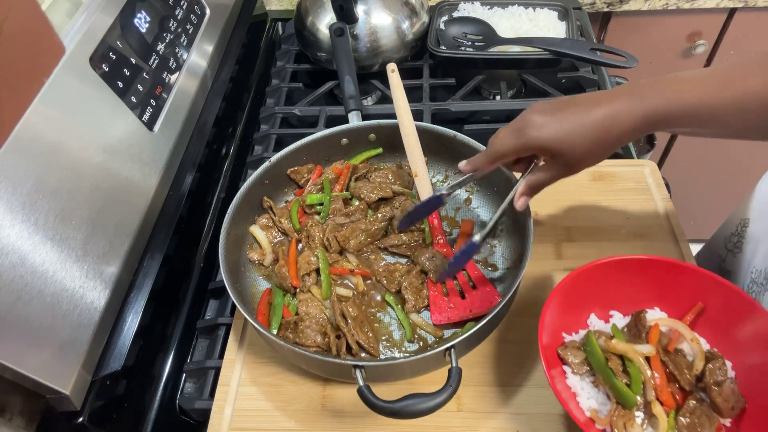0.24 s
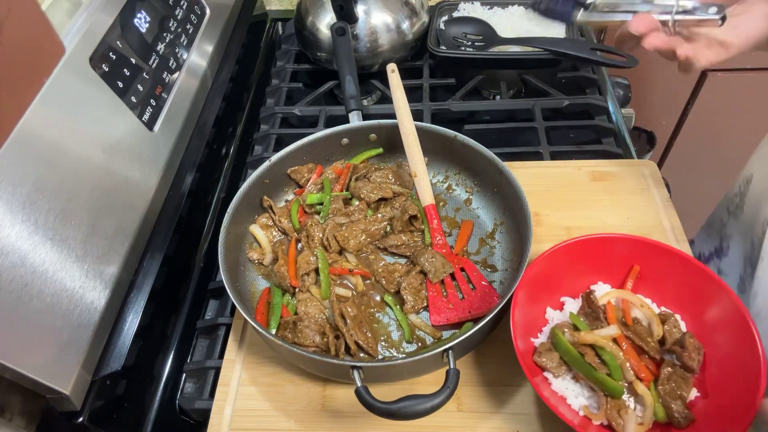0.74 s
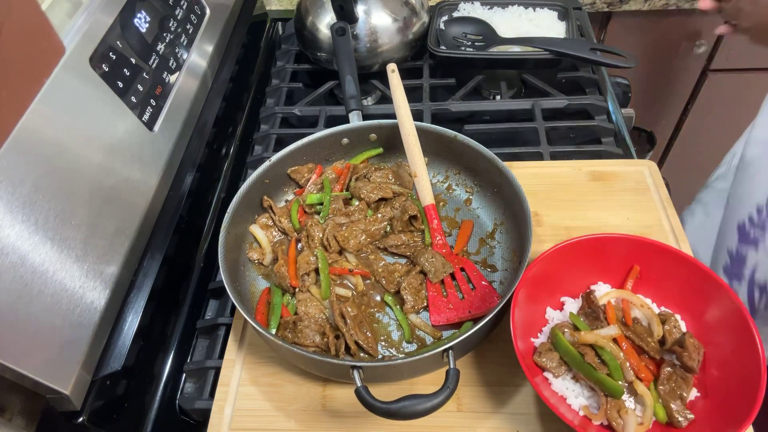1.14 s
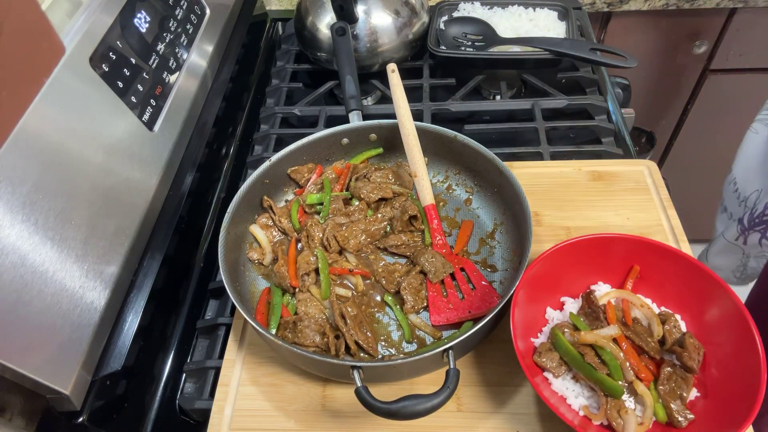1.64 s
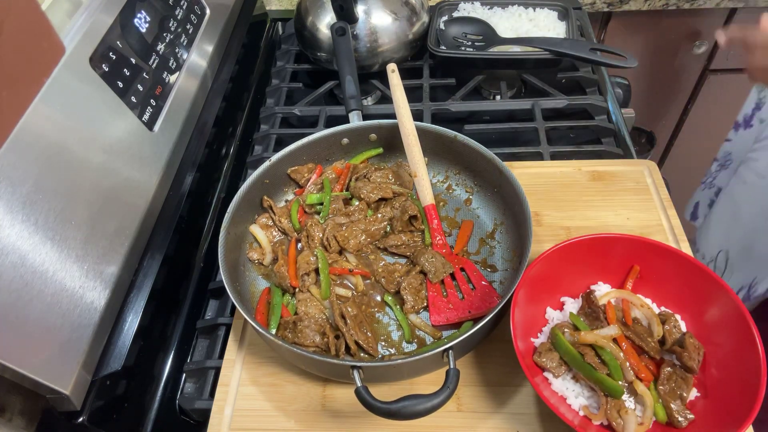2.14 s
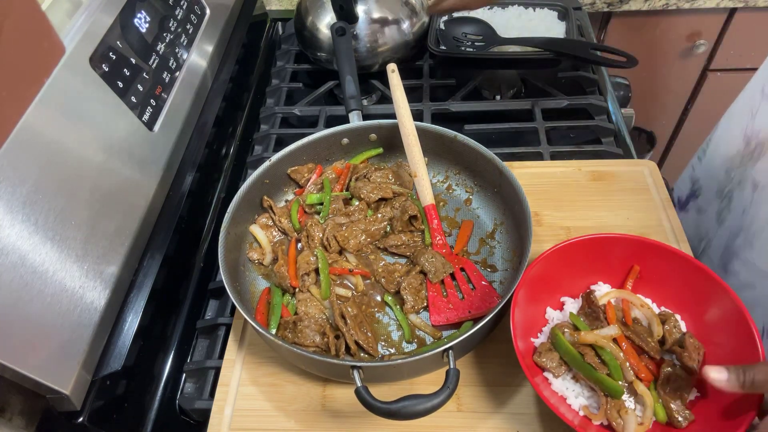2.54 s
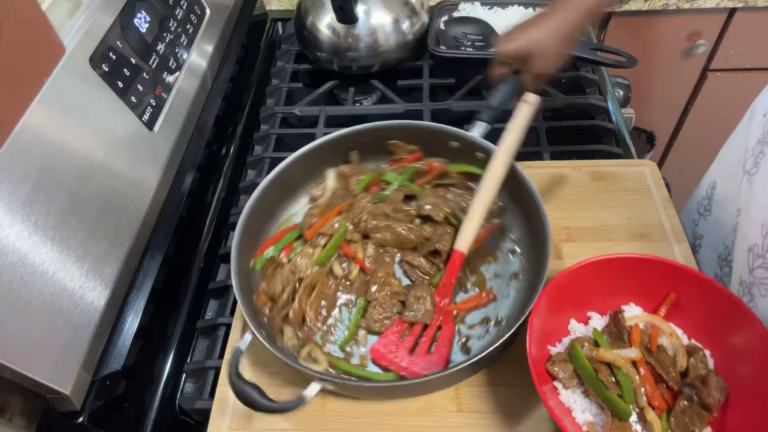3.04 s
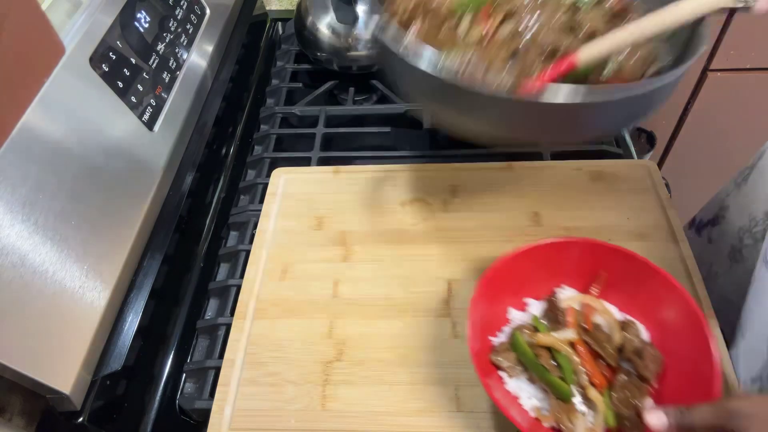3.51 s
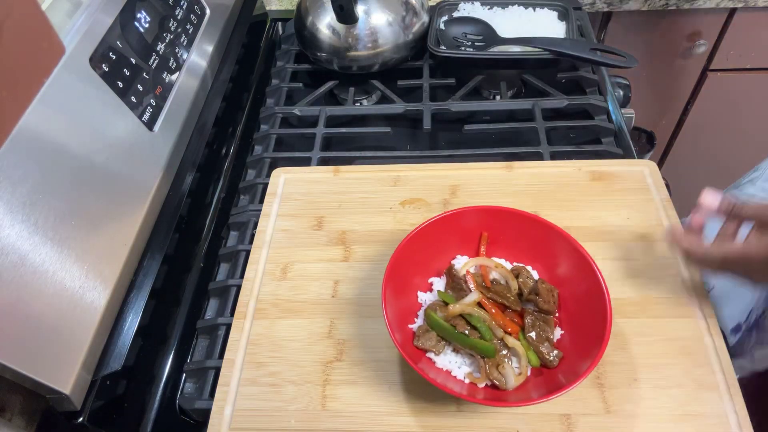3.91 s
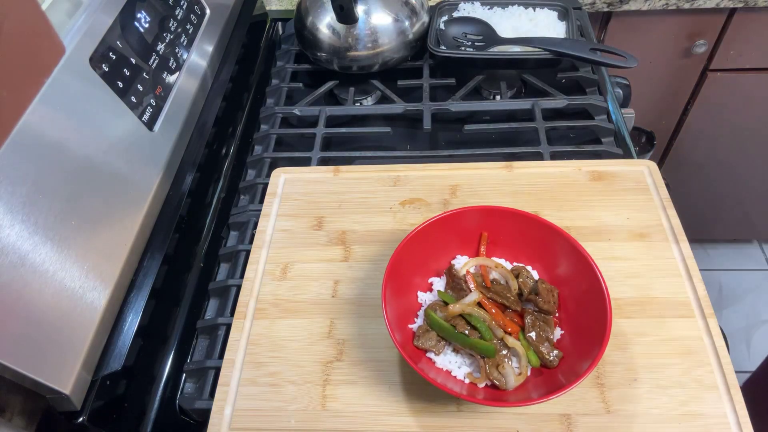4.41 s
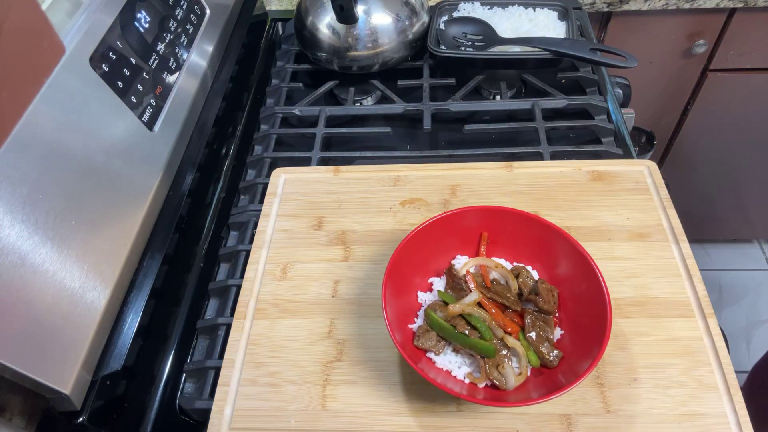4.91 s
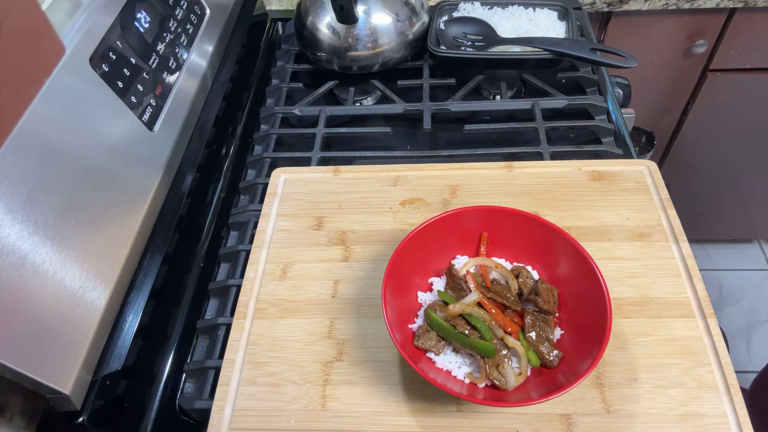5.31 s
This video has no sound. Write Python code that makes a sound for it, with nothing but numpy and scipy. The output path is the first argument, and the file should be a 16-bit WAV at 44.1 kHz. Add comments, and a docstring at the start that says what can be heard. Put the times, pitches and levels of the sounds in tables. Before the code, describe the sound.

Metal tongs knock hard on a pan and rattle brightly, then a pan is lifted, a bowl slides over wood, and cutlery clinks over a low hum.

```python
"""Steel tongs knock on a pan and a wooden board at a kitchen counter, rattle in the hand and are laid down:
knocks are banded noise bursts with rings and a thud, bright ticks are coloured bursts through resonances.
The pan is lifted and a bowl slides over the board (flickering noise); something lands among cutlery further
off (struck modes). A refrigerator hums in sine lines over room noise; a small hard-walled room echoes."""
import sys
import numpy as np
from scipy import signal
from scipy.fft import rfft, irfft
from scipy.io import wavfile

SR = 44100
rng = np.random.default_rng(int(sys.argv[2]) if len(sys.argv) > 2 else 0)


def output_pcm(signal):
    """Save a mono or channel-first signal as 16-bit PCM at the path in sys.argv[1].

    Samples are clipped to [-1, 1] before scaling.
    """
    pcm = np.clip(np.atleast_2d(signal).T, -1, 1) * 32767
    wavfile.write(sys.argv[1], SR, np.round(pcm).astype(np.int16))


N = 244887


def from_db(db):
    """dB to gain."""
    return 10 ** (np.asarray(db) / 20)


def rms_one(x):
    """Scaled to rms 1."""
    return x / np.sqrt(np.mean(x ** 2) + 1e-20)


def at_hz(points, hz):
    """A (frequency, value) table read on a log-frequency axis."""
    table_hz, values = np.array(points).T
    return np.interp(np.log(np.maximum(hz, 1)), np.log(table_hz), values)


def shaped(x, gain_at):
    """Zero-phase colouring by a gain function of frequency."""
    hz = np.fft.rfftfreq(len(x), 1 / SR)
    return irfft(rfft(x) * gain_at(hz), len(x))


def coloured(x, points):
    """Zero-phase colouring by a (frequency, dB) table."""
    return shaped(x, lambda hz: from_db(at_hz(points, hz)))


def drift(rate_hz):
    """Slow random curve with rms 1."""
    return rms_one(shaped(rng.standard_normal(N), lambda hz: 1 / (1 + (hz / rate_hz) ** 2)))


def body(x, peaks):
    """Parallel two-pole resonances, signs alternating."""
    out = 0
    for k, (hz, width_hz, level_db) in enumerate(peaks):
        r = np.exp(-np.pi * width_hz / SR)
        top = (-1) ** k * from_db(level_db) * (1 - r * r) / 2
        poles = [1, -2 * r * np.cos(2 * np.pi * hz / SR), r * r]
        out = out + signal.lfilter([top, 0, -top], poles, x)
    return out


def add(out, start_s, peak_db, sound):
    """Lays one sound into the track with the given peak."""
    at = round(start_s * SR)
    scaled = from_db(peak_db) * sound / np.max(np.abs(sound))
    out[at:at + len(sound)] += scaled[:N - at]


def dying(noise, t60_s):
    """Falls 60 dB in t60_s, 4 ms at least."""
    return noise * from_db(-60 * np.arange(len(noise)) / SR / max(t60_s, .004))


def knocks():
    """A click and dying noise, banded by contact hardness, ring the counter over a low thud; dry and room send."""
    # dull blows on pan, board and counter: (time [s], peak [dB], strongest ring [Hz], ring level [dB],
    # hardness as reach above the ring [octaves, held to 0.2-3.2], noise t60 [s], thud [dB], room send [dB])
    blow_table = [(0.087, -25, 660, 3, 1.04, 0.05, 10.5, -7.5),
                  (0.426, -1.5, 907, -5.5, 1.39, 0.098, -7, -12),
                  (0.556, -15.5, 556, 0, 0.52, 0.041, -8, -8), (0.563, -5.5, 863, -3, 1.1, 0.05, -2.5, -13),
                  (0.588, -7, 1050, -13, 1.07, 0.099, -3.5, -9),
                  (0.724, -15, 1047, 6.5, 0.93, 0.034, -2, -12),
                  (0.762, -29, 1060, -5, 0.55, 0.027, -14, -7),
                  (0.781, -35.5, 1060, -3, 0.6, 0.022, -14, -15),
                  (2.108, -25, 1200, -4, 0.63, 0.054, -6, -13),
                  (2.117, -20, 767, -10, 0.5, 0.067, -8.5, -7.5), (2.18, -34, 670, 7, 0.5, .03, -14, -11),
                  (2.754, -21.5, 850, -6.5, 0.63, 0.052, 4, -13),
                  (2.957, -27, 1080, 0.5, 1.14, 0.065, -1.5, -3.5),
                  (3.089, -19, 577, 1, 1.6, 0.065, 1, -10), (3.109, -28.5, 1010, -9, 1.8, 0.071, 0.5, 5.5),
                  (3.188, -25.5, 970, -1, 2.1, 0.1, 1, -16), (3.425, -29, 540, 3, 0.7, 0.056, -23, -18),
                  (3.768, -21.5, 480, 2, 0.25, .05, -0.5, -7.5),
                  (4.645, -6.5, 542, 2, 1.24, 0.097, -6.5, -6), (4.65, -5.5, 258, 1, 3.7, .12, -7.5, -9.5),
                  (4.813, -29.5, 590, 14, 0.5, 0.1, -18, 1.5), (4.839, -22.5, 577, -18, 1.8, 0.1, 2, -17),
                  (4.867, -26, 600, 11, 1.6, 0.14, -14, -11),
                  (5.191, -26.5, 610, -14, 1.15, 0.073, 2.5, -4.5),
                  (5.22, -37, 526, -12, 0.97, .07, 0.5, -0.5), (5.262, -32.5, 644, -18, 1.6, .065, -6, -14)]
    # counter resonances: (frequency [Hz], width [Hz], level [dB])
    counter_peaks = [(490, 35, 20), (599, 16, -29.5), (673, 37, 15.5), (892, 21, -12), (1000, 45, -6.5),
                     (1370, 47, 4.5), (1446, 32, -10.5), (1684, 50, -22.5), (1890, 19, -12.5),
                     (2320, 220, 2), (3026, 33, -14)]
    # low body of the worktop, per pass: (frequency [Hz], width [Hz], level [dB])
    thud_peaks = [(153.4, 33, -4.5), (283.3, 62, -1), (388, 110, -1.5)]
    rise_s, low_cut_hz, crack_db, counter_db = 0.00146, 450, 14.5, -7.5
    low_cut = signal.butter(2, low_cut_hz, "high", fs=SR, output="sos")
    out, send = np.zeros(N), np.zeros(N)
    noise = rng.standard_normal((len(blow_table), 2, SR // 3))
    t = np.arange(SR // 3) / SR
    for (s, peak_db, ring_hz, ring_db, reach_oct, t60_s, thud_db, room_db), row in zip(blow_table, noise):
        push = dying(row[0], t60_s) * np.minimum(t / rise_s, 1)
        push[round(rise_s * SR)] += from_db(crack_db)   # first click
        top_hz = ring_hz * 2 ** np.clip(reach_oct, .2, 3.2)
        contact = np.vstack([low_cut, signal.butter(3, top_hz, fs=SR, output="sos")])
        blow = signal.sosfilt(contact, push)
        ring = from_db(ring_db) * rms_one(body(blow, [(ring_hz, 100, 0)]))
        counter = from_db(counter_db) * rms_one(body(blow, counter_peaks))
        # rung twice, so it swells late
        thud = body(body(dying(row[1], 2.0 * t60_s), thud_peaks), thud_peaks)
        sound = rms_one(blow) + ring + counter + from_db(thud_db) * rms_one(thud)
        add(out, s, peak_db, sound)
        add(send, s, peak_db + room_db, sound)
    return out, send


def bright_ticks():
    """A snap, then a bright uneven rattle as of thin sheet steel; each has its own tilt and mix of resonances."""
    # touches of the steel tongs, and the bright edge of the harder blows:
    # (time [s], peak [dB], treble lean [dB per octave], rattle t60 [s])
    tick_table = [(0.1526, -39, -4, 0.021), (0.1799, -37, 0, 0.027), (0.2172, -44, -10, 0.084),
                  (0.266, -31.5, -1.5, 0.047), (0.302, -32.5, -1, 0.04), (0.3416, -31, -1.5, 0.065),
                  (0.391, -37, -3, 0.023), (0.405, -30, 5, 0.032), (0.4977, -24.5, 0, 0.014),
                  (0.5063, -29, -3, 0.049), (0.5639, -16.5, -13, 0.035), (0.589, -10, -8, 0.019),
                  (0.6075, -20.5, 6, 0.083), (0.752, -35.5, 1, 0.06), (0.781, -29.5, 7, 0.13),
                  (0.8038, -17, 1, 0.036), (0.9195, -35, -2, 0.21), (1.0232, -27, 0.5, 0.075),
                  (1.0313, -20.5, 2.5, 0.08), (1.0506, -25.5, 4, 0.074), (1.0662, -28, -3.5, 0.063),
                  (1.08, -15.5, 2.5, 0.086), (1.1317, -19.5, 1.5, 0.15), (1.192, -24, 1, 0.12),
                  (1.2197, -29.5, 6, 0.14), (1.2583, -19.5, 0.5, 0.061), (1.3454, -33.5, -1, 0.08),
                  (1.371, -38.5, -1.5, 0.45), (1.4263, -37.5, -2.5, 0.38), (1.4507, -28.5, 2, 0.2),
                  (1.4969, -25, 1.5, 0.21), (1.524, -23, -2, 0.13), (1.5383, -33, -1, 0.061),
                  (1.6018, -24, 0.8, 0.11), (1.699, -42.5, -6, 0.45), (1.7633, -28.5, -2.5, 0.31),
                  (1.8002, -24.5, 0.1, 0.12), (1.999, -47.5, -5.5, 0.46), (2.089, -38.5, -3, 0.08),
                  (2.1065, -7.5, -2.5, 0.058), (2.9594, -21, -7, 0.022), (3.25, -40, -40, 0.064),
                  (4.6462, -12.5, -9.5, 0.1), (4.8305, -22, -6, 0.15), (5.191, -38, -9.5, 0.088),
                  (5.218, -44.5, 2, 0.13), (5.261, -36.5, -13, 0.036)]
    # tick spectrum before the lean: (frequency [Hz], level [dB per Hz])
    steel_colour = [(710, -57), (1200, -24), (2010, -18), (2340, -10.5), (3550, -5.5), (6940, -6),
                    (9850, 0), (12500, -8), (15300, -3.5), (16500, -27)]
    # steel resonances before the random change: (frequency [Hz], width [Hz], level [dB])
    steel_peaks = [(2465, 260, -11.5), (3935, 210, 5.5), (4120, 1300, -5), (5480, 170, 7),
                   (6120, 450, -8.5), (7590, 660, 6), (8750, 200, -13.5), (9830, 68, 1.5),
                   (10550, 890, -12.5), (12360, 780, 3.5), (12400, 500, -22.5), (16300, 410, 1.5)]
    rise_s, snap_db, snap_t60_s = 0.0018, 6, 0.004
    out = np.zeros(N)
    noise = rng.standard_normal((len(tick_table), SR // 4))
    wake_db = rng.normal(0, 3, (len(tick_table), len(steel_peaks)))
    t = np.arange(SR // 4) / SR
    chatter_db = 3.0 * drift(120)   # uneven bouncing
    for (s, peak_db, lean_db, t60_s), row, woken_db in zip(tick_table, noise, wake_db):
        def steel_gain(hz):
            """Steel colour tilted about 6 kHz."""
            octaves = np.log2(np.clip(hz, 1500, 16000) / 6000)
            return from_db(at_hz(steel_colour, hz) + lean_db * octaves)

        steel = shaped(row, steel_gain)
        bounce_db = np.roll(chatter_db, -round(s * SR))[:len(t)]
        rattle = dying(steel * from_db(bounce_db), t60_s)
        snap = from_db(snap_db) * dying(steel, snap_t60_s)
        tick = (rattle + snap) * np.minimum(t / rise_s, 1)
        peaks = [(hz, width_hz, level_db + more_db)
                 for (hz, width_hz, level_db), more_db in zip(steel_peaks, woken_db)]
        add(out, s, peak_db, rms_one(tick) + rms_one(body(tick, peaks)))
    return out


def cutlery():
    """Rapid touches strike every mode, its short broad held ring and its twins in like pieces; neighbours beat."""
    # cutlery slides against cutlery: (time [s], relative strength of the touches [dB])
    jingle_table = [(4.825, -53), (4.831, -38), (4.839, -27.5), (4.864, -22.5), (4.95, -90)]
    # modes: (frequency [Hz], relative peak [dB], t60 [s])
    modes = [(2125, -16, 0.26), (4360, -15, 0.14), (5830, -12.5, 0.11), (6560, -15.5, 0.16),
             (7240, -26, 0.2), (7630, -6, 0.086), (9420, -3.5, 0.12), (9420, -6.5, 0.14), (9396, -17, 0.1),
             (9900, -18.5, .11), (10700, -18, .15), (11152, -8.5, 0.13), (11640, -15, .15),
             (11870, -15, 0.16), (11950, -14, .15), (12200, -16.5, .12), (13439, -3, 0.12),
             (13488, -8, 0.1), (13630, -10, 0.12), (14070, -20, 0.14), (14846, -13, 0.13),
             (14883, -12, 0.15), (15720, -20, .12)]
    jingle_db, touches_per_s = -24.5, 1500
    held_db, held_t60_s = -1, .03
    twin_db, twin_spread = -5.5, 0.011   # spread as share of the pitch
    s, strength_db = np.transpose(jingle_table)
    t, first = np.arange(N) / SR, round(s[0] * SR)
    struck = (rng.random(N) < touches_per_s / SR) * (t < s[-1])
    touches = (struck * from_db(np.interp(t, s, strength_db)))[first:first + SR // 2]
    out = np.zeros(N)
    twin_ratios = 1 + twin_spread * rng.standard_normal((len(modes), 3))
    for (hz, level_db, t60_s), ratios in zip(modes, twin_ratios):
        rings = [(hz, t60_s, 0), (hz, held_t60_s, held_db)]
        rings += [(hz * ratio, t60_s, twin_db) for ratio in ratios]
        for pitch_hz, decay_s, extra_db in rings:
            r, w = from_db(-60 / (decay_s * SR)), 2 * np.pi * pitch_hz / SR
            strikes = touches * rng.standard_normal(len(touches)) + 1e-18
            ring = signal.lfilter([0, np.sin(w)], [1, -2 * r * np.cos(w), r * r], strikes)
            add(out, s[0], level_db + extra_db + jingle_db, ring)
    return out


def drags():
    """Dense slips of uneven size ring the board; the faces hiss along, all catching and letting go together."""
    # shoves over the board: (full strength at [s], swell [s per 20 dB], hold [s], fade [s per 20 dB],
    # wood rumble [dB], grit under the base [dB], hiss of the faces [dB])
    shove_table = [(0.001, 0.0041, 0.001, .085, -32.5, -50, -52.5),
                   (0.096, 0.09, 0.0044, 0.11, -44.5, -59, -53.5),
                   (2.61, .15, 0.087, .05, -73, -69.5, -65.5), (2.782, 0.052, .005, 0.061, -42, -64, -61),
                   (2.863, 0.15, 0.16, .03, -57.5, -59, -57.5),
                   (3.063, 0.1, 0.14, 0.051, -44.5, -43, -46.5), (3.097, 0.014, .005, 0.026, -30, -40, -44),
                   (3.212, 0.077, .005, 0.044, -56, -54, -55),
                   (3.254, 0.0088, 0.0076, 0.033, -42.5, -42.5, -39.5),
                   (3.518, 0.31, 0.19, 0.16, -32.5, -47, -43.5),
                   (4.211, 0.028, 0.0043, 0.1, -81.5, -56.5, -58),
                   (4.898, .02, 0.0046, 0.15, -61, -44.5, -49), (4.942, 0.027, .12, 0.27, -48, -58.5, -66),
                   (5.27, 0.056, .005, 0.056, -46, -57, -62.5)]
    # rumble, grit and hiss spectra: (frequency [Hz], level [dB per Hz])
    wood_colour = [(150, -12), (260, -7.5), (500, 1), (1300, -1), (1700, -39), (2600, -49), (5000, -62)]
    grit_colour = [(900, -14), (1500, 5.5), (2200, 4), (3200, 1), (5000, -16.5)]
    rub_colour = [(1760, -37), (3000, -21), (3990, 0), (5820, -6), (7500, -9.5), (9870, -10), (12800, -19),
                  (13900, -13), (15900, -45), (16500, -49)]
    # board and bowl foot resonances: (frequency [Hz], width [Hz], level [dB])
    board_peaks = [(265, 48, -4.5), (390, 47, 7), (492.3, 40, 8), (512, 80, 5.5), (712, 46, -3),
                   (900, 33, 3.5), (1025, 54, 5.5), (1010, 48, 8), (1264, 13, -15.5), (1326, 52, 5),
                   (2160, 310, -7)]
    foot_peaks = [(3730, 170, 9.5), (4190, 72, 8.5), (4380, 130, -14), (6300, 80, -19)]
    slips_per_s, board_db, foot_db = 5000, 8, -8.5
    t, power = np.arange(N) / SR, np.zeros((3, N))
    slips = (rng.random(N) < slips_per_s / SR) * rng.standard_normal(N)
    catch = drift(26)
    wood = rms_one(coloured(slips, wood_colour))
    board = from_db(board_db) * rms_one(body(wood, board_peaks))
    rumble = rms_one((wood + board) * from_db(0.3 * catch))
    faces = rms_one(coloured(rng.standard_normal(N), rub_colour))
    foot = from_db(foot_db) * rms_one(body(faces, foot_peaks))
    hiss = rms_one((faces + foot) * from_db(1.3 * catch))
    grit = rms_one(coloured(slips, grit_colour) * from_db(0.44 * catch))
    for s, swell_s, hold_s, fade_s, *levels_db in shove_table:
        away = np.maximum((s - t) / swell_s, (t - s - hold_s) / fade_s)
        weaker_db = 20 * np.maximum(away, 0)
        power += np.outer(from_db(levels_db), from_db(-weaker_db)) ** 2
    return np.sum(np.sqrt(power) * [rumble, grit, hiss], axis=0)


def fridge():
    """Compressor lines, each wavering a little in level."""
    # (frequency [Hz], level [dB rms])
    hum_lines = [(59.2, -30.5), (118.4, -59), (177.6, -65), (236.9, -58), (296.1, -57.5), (355.3, -69),
                 (473.7, -83)]
    t, out = np.arange(N) / SR, np.zeros(N)
    for hz, level_db in hum_lines:
        gain = from_db(level_db + 0.31 * drift(1.7))
        out += gain * np.sqrt(2) * np.sin(2 * np.pi * (hz * t + rng.random()))
    return out


def room_air():
    """Steady coloured room noise."""
    # (frequency [Hz], relative level [dB per Hz])
    air_colour = [(20, -10), (40, -6.5), (60, 4.5), (110, 5), (150, -3.5), (250, -14), (450, -13),
                  (600, -21), (1200, -26), (2500, -32.5), (4000, -36), (7000, -43.5), (11000, -41.5),
                  (15500, -38.5), (16100, -89.5)]
    air_db_rms = -46
    return from_db(air_db_rms) * rms_one(coloured(rng.standard_normal(N), air_colour))


def kitchen(x):
    """Dense reflections from 4 ms on, each half-octave dying at its own rate."""
    # (frequency [Hz], t60 [s])
    room_t60 = [(150, 0.72), (500, 0.37), (1500, 0.46), (4000, 0.38), (9000, 0.37), (15000, 0.27),
                (17000, 0.029)]
    echo, edges_hz = 0, 85 * 2 ** np.arange(0, 8.1, .5)
    for low_hz, high_hz in zip(edges_hz, np.minimum(edges_hz[1:], .45 * SR)):
        band_pass = signal.butter(2, [low_hz, high_hz], "band", fs=SR, output="sos")
        band = signal.sosfilt(band_pass, rng.standard_normal(SR // 2))
        echo = echo + dying(band, at_hz(room_t60, np.sqrt(low_hz * high_hz)))
    echo = echo / np.sqrt(np.sum(echo ** 2))   # unit energy
    echo = np.concatenate([np.zeros(SR // 250), echo])
    return signal.fftconvolve(x, echo)[:N]


def scene():
    """Blows, ticks and cutlery sound dry and through the room, over drags, hum and air."""
    bright_send_db = -6.5
    blows, blows_send = knocks()
    bright = bright_ticks() + cutlery()
    echoes = kitchen(blows_send + from_db(bright_send_db) * bright)
    return (blows + bright + echoes + drags() + fridge() + room_air())[None]


def record(dry):
    """Steep low-pass: 60 dB down from 17.05 kHz up."""
    return signal.sosfilt(signal.cheby2(12, 60, 17050, fs=SR, output="sos"), dry)


dry = scene()
out = record(dry)
output_pcm(out)
```